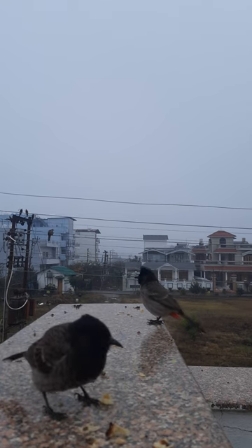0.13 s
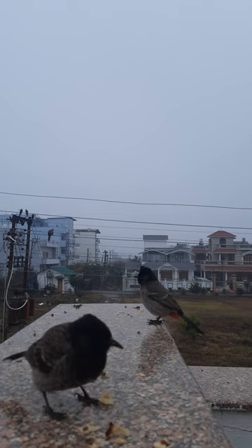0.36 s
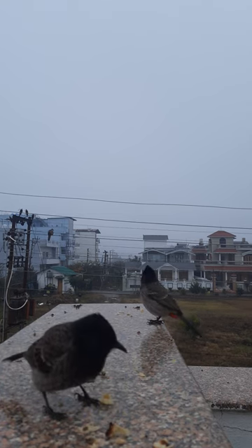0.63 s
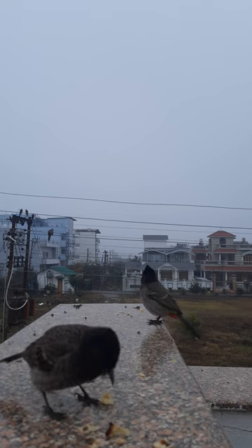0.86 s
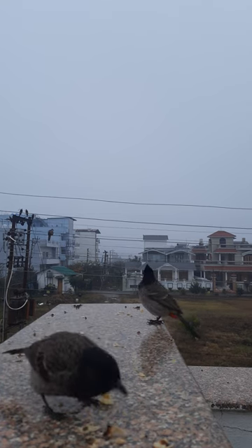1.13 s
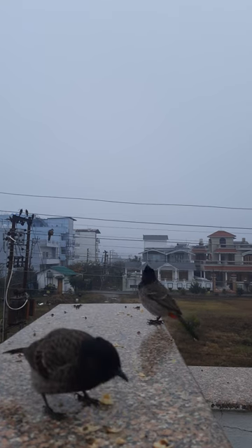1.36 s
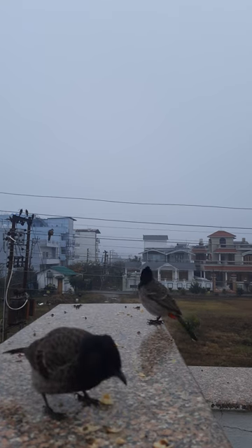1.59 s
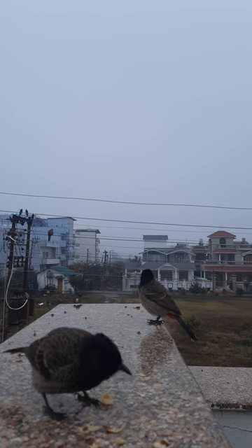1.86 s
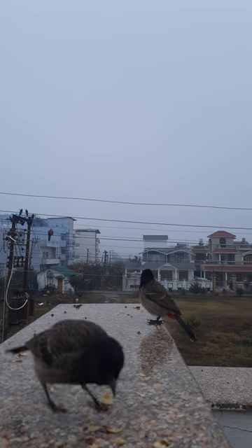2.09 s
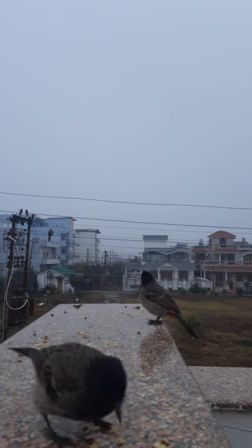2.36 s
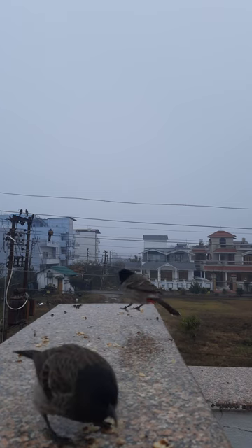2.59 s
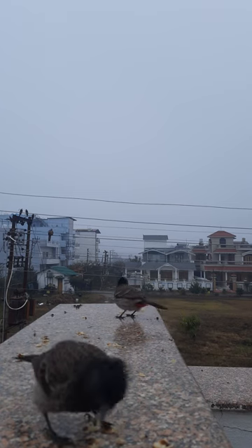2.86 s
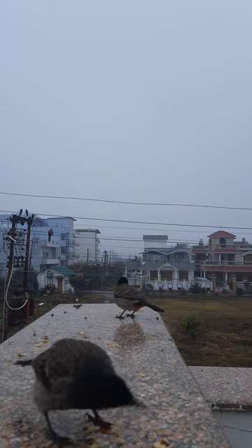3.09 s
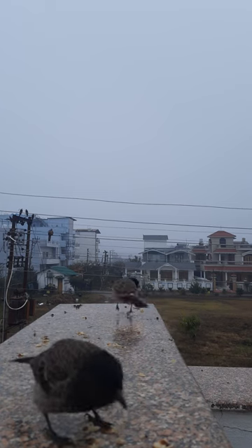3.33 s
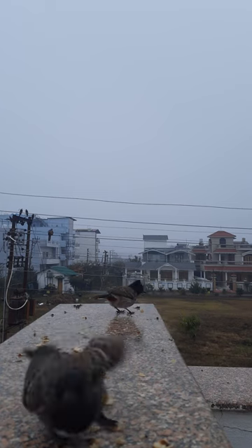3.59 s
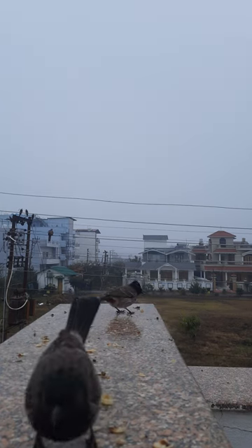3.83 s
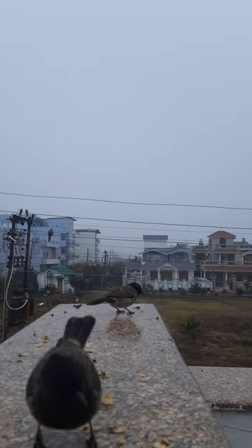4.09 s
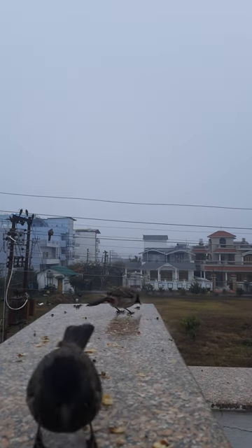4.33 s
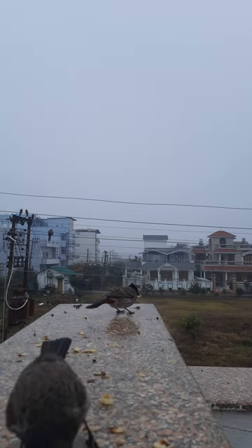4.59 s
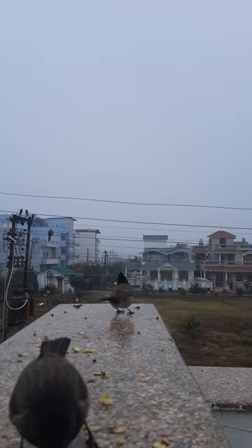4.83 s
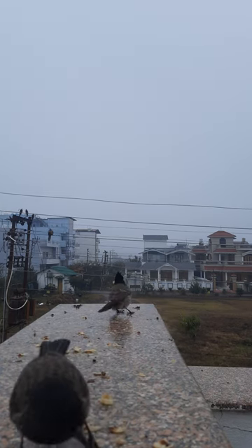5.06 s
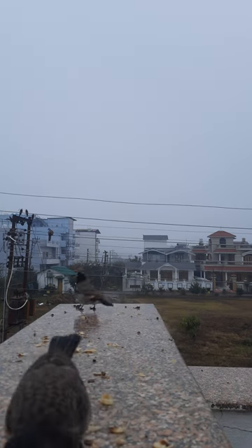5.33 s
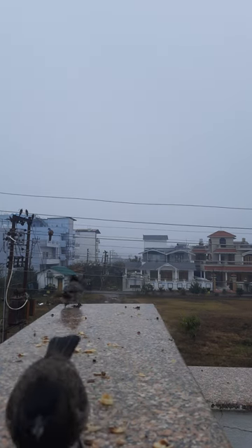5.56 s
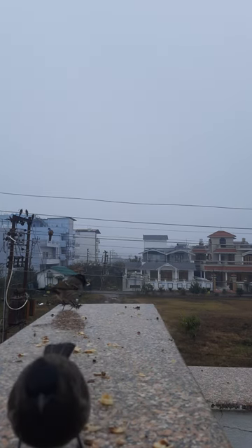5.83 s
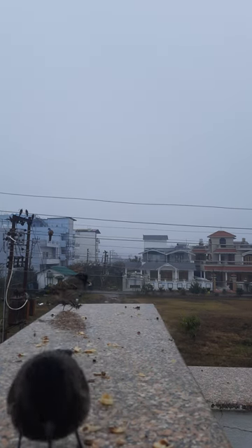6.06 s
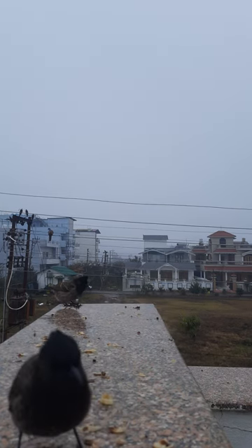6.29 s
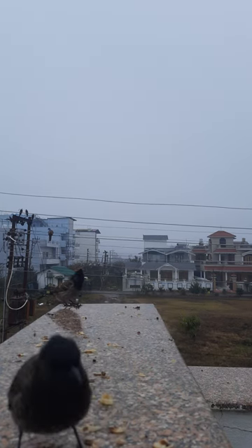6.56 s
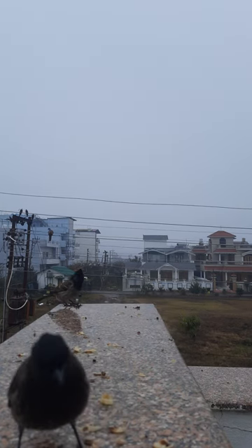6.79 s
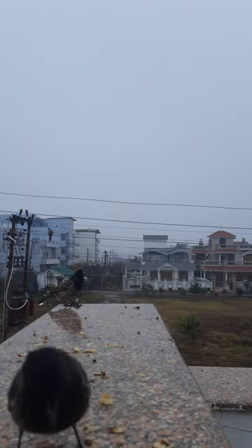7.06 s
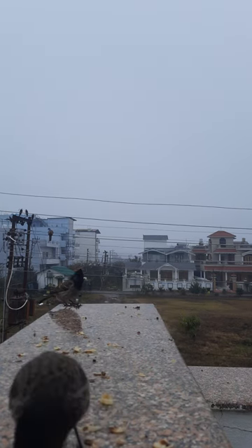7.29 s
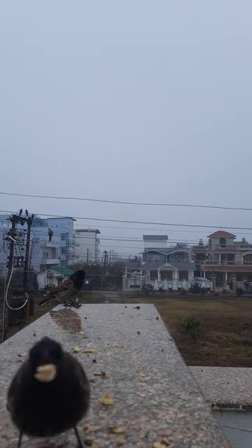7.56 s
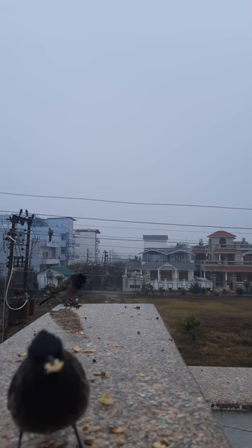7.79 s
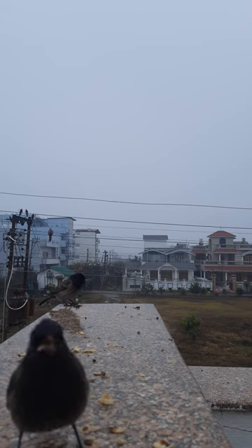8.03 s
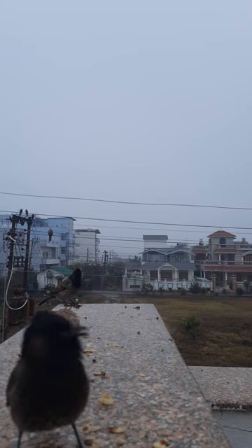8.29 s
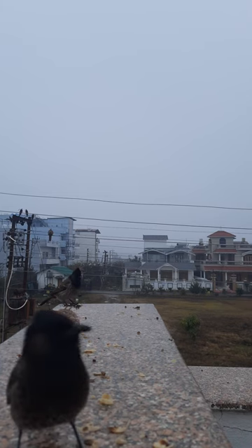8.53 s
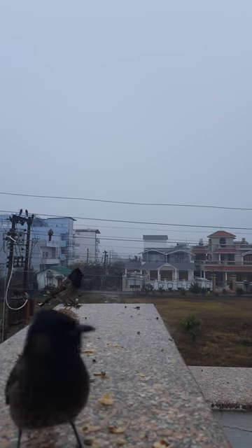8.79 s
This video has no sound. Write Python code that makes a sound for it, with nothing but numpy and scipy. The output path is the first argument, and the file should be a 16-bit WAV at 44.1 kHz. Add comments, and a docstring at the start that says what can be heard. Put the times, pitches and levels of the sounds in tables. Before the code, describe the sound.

A low town rumble runs throughout under a faint, echoing flock of twittering birds, with thin whistles, a distant dove's low coos at about 0, 0.8, 2.3, 2.9 and 7.7 s, and a hoarse rasp roughly every two seconds. A near bird gives short falling chirps at 0.8, 1.3, 2.0, 2.2 and 2.5 s, then from 4.8 to 6.1 s. Pecks and hops knock through the stone from 2.2 s: a heavy thud at 3.2, clusters at 3.7, 4.6 and 4.8, a sharp hard crack at 5.3. Dull clacks rattle further off. At 6.3 s comes a tiny startled squawk, then feathers flurry with a low shudder around 6.4-6.5. A hard thump lands at 7.3, another knock at 7.7, then rustling fades, with soft bumps at 8.0 and 8.7. Left sounds open and airy; right is pressed to stone, muffled and boomy.

```python
"""From the start a town hums, a flock twitters and whistles, a dove coos and a rasp recurs about every two seconds;
from 0.84 s a near bird chirps. From 2.2 s birds peck and hop on a stone ledge, up to a squawk at 6.3 s and a burst
of feathers at 6.4 s; after a last hard thump at 7.3 s the rustle sinks. Left is an open microphone; right is
pressed to the stone, a cavity that booms near 400 Hz. Calls are pitch tracks, contacts bursts, beds coloured noise."""
import sys
import numpy as np
from scipy import signal
from scipy.fft import rfft, irfft, next_fast_len
from scipy.io import wavfile
from scipy.ndimage import uniform_filter1d, minimum_filter1d

SR = 44100
rng = np.random.default_rng(int(sys.argv[2]) if len(sys.argv) > 2 else 0)


def materialize(psi):
    """Save the field psi as 16-bit PCM at rate SR to the path in sys.argv[1].

    A 1-D psi becomes a single channel; in a 2-D psi each row is a channel.
    """
    bounded = np.clip(np.atleast_2d(psi).T, -1, 1)
    quanta = np.round(bounded * 32767).astype(np.int16)
    wavfile.write(sys.argv[1], SR, quanta)


def rack_gain(trim_db):
    """Turn a fader trim in dB into the linear factor to multiply a signal by."""
    fader = np.asarray(trim_db, float)
    return 10 ** (fader / 20)


N = 392931


def level(x, db):
    """Set the rms level."""
    return x * rack_gain(db) / np.sqrt(np.mean(x ** 2))


def curve(table):
    """Join (time [s], value) points by straight lines, one value a sample."""
    s, value = np.transpose(table)
    return np.interp(np.arange(N) / SR, s, value)


def bouts(table, rest_db):
    """Bell-shaped swells of power over a resting level, in dB."""
    t = np.arange(N) / SR
    power = rack_gain(2 * rest_db)
    for s, half_s, db in table:
        power = power + rack_gain(2 * db) * np.exp(-((t - s) / half_s) ** 2)
    return 10 * np.log10(power)


def noise(points, source=None):
    """White noise, or a given source, coloured by (Hz, dB) points and silent outside them."""
    size = next_fast_len(N)
    hz, db = np.transpose(points)
    log_hz = np.log(np.arange(1, size // 2 + 2) * SR / size)
    gain = rack_gain(np.interp(log_hz, np.log(hz), db, left=-200, right=-200))
    white = rng.standard_normal(N) if source is None else source
    return irfft(rfft(white, size) * gain, size)[:N]


def walk(rate_hz):
    """Random levels held 1 / rate s and slewed twice; spread near 1."""
    k = int(SR / rate_hz)
    held = np.repeat(rng.standard_normal(N // k + 1), k)
    return 4 / 3 * uniform_filter1d(uniform_filter1d(held, k), k)[:N]


def grains(rate_hz, spread_db):
    """Dense tiny contacts, most of them faint and a few sharp."""
    hit = rng.random(N) < rate_hz / SR
    return hit * rng.standard_normal(N) * rack_gain(spread_db * rng.exponential(size=N))


def resonance(x, hz, width_hz, low=False):
    """Two-pole band-pass (peak gain 1) or low-pass (bass gain 1); no prewarp, so high tunings land lower."""
    w = 2 * np.pi * hz
    top = [w * w] if low else [2 * np.pi * width_hz, 0]
    return signal.lfilter(*signal.bilinear(top, [1, 2 * np.pi * width_hz, w * w], SR), x)


def mode(x, hz, width_hz, db):
    """One ringing mode: the band-pass applied twice."""
    return rack_gain(db) * resonance(resonance(x, hz, width_hz), hz, width_hz)


def add(track, s, piece):
    """Mix a short piece into a track at s seconds."""
    i = max(int(s * SR), 0)
    track[i:i + len(piece)] += piece[:N - i]


def echoes(x, t60_s):
    """Diffuse echo off the house fronts, its tail at unit energy."""
    t = np.arange(int(.5 * SR)) / SR
    tail = rng.standard_normal(len(t)) * np.exp(-np.log(1000) * t / t60_s) * np.clip(t / 0.0032, 0, 1)
    return signal.fftconvolve(x, tail / np.sqrt(np.sum(tail ** 2)))[:N]


def glide(length, first_hz, last_hz, arch_hz):
    """Pitch of a straight glide with an arch in the middle, lasting 1.15 times the length given."""
    u = np.linspace(-1, 1, int(length * 1.15 * SR))
    return (first_hz + last_hz) / 2 + (last_hz - first_hz) / 2 * u + arch_hz * (1 - u * u)


def call(hz, db, octave_db=-60, fade_db=3):
    """One note along a pitch track; its octave is loudest where it meets the throat resonance."""
    throat_hz = 2460
    u = np.linspace(-1, 1, len(hz))
    phase = 2 * np.pi * np.cumsum(hz) / SR
    octave = rack_gain(-5 - 0.03 * np.abs(2 * hz - throat_hz)) + rack_gain(octave_db + 6 * u)
    envelope = (1 - u * u) ** 0.8 * rack_gain(-fade_db * u)
    return rack_gain(db + 7.0) * envelope * (np.sin(phase) + octave * np.sin(2 * phase))


# pecks and hops felt through the stone: (time [s], relative level [dB], push width [ms])
KNOCK_BLOWS = [(.532, -24.5, 0.92), (1.103, -33, 0.45), (2.1784, -7.5, 0.56), (2.1911, -19, 0.49),
               (2.3807, -23, 2), (2.58, -16, 0.98), (2.695, -29.5, 0.18), (2.7029, -21.5, 0.81),
               (3.166, -32.5, 0.345), (3.226, -22.5, 0.72), (3.2356, 5.5, 2.36), (3.2586, -6.5, 4.8),
               (3.35, -16, 3.9), (3.3689, -9, 3.75), (3.43, -31.5, 0.44), (3.441, -26, 0.47),
               (3.7296, -11.5, .78), (3.7388, -21, 0.73), (3.7561, -16.5, 1.9), (3.7661, -18, 0.54),
               (4.4931, -17, 0.58), (4.6153, -8, .91), (4.6264, -2.5, 1.25), (4.6355, -4.5, 0.76),
               (4.6443, -17.5, 1), (4.6557, -16, 0.8), (4.823, -4, 0.78), (4.834, -8, 0.68),
               (4.8817, -18.5, 0.73), (4.8888, -15, 0.81), (5.2697, -22.5, 1.1), (5.3026, -12.5, 1.4),
               (5.3107, -19, .38), (5.3237, -27.5, .06), (5.331, -25, 0.92), (5.343, 5, 0.79),
               (5.367, -1, 0.86), (5.5275, -30.5, 0.17), (5.534, -35, .12), (5.549, -28, 0.02),
               (5.822, -14, 1.7), (5.84, -21.5, 0.83), (5.8485, -24, 1.4), (5.956, -24, 1.2),
               (6.188, -31.5, 0.17), (6.223, -23.5, 0.48), (6.3204, -22, 2.8), (6.346, -13.5, 3.65),
               (6.397, -29, 2.2), (6.4303, -19.5, 2.3), (6.4546, -10.5, 3.7), (6.4711, -4, 3.75),
               (6.4779, 2, 3.8), (6.5012, -1, 6.5), (6.6065, -27, 1.3), (6.828, -9, 1.46),
               (6.8444, -20, 1.06), (6.8676, -20.5, 3), (7.279, 5, 1.04), (7.381, -27.5, 0.98),
               (7.652, -17.5, 1.23), (7.6582, -2.5, 3.2), (7.6785, -16.5, 1.9), (7.6925, -20, 2.3),
               (7.701, -38, .16), (7.715, -23.5, 2.3), (7.9979, -13, 3.7), (8.668, -21.5, 3.8),
               (8.7096, -16, 4.2), (8.7192, -16.5, 3.45)]
# what a hard crack rings in the stone: (tuning [Hz], width [Hz], relative level [dB])
STONE_MODES = [(720, 370, -3.5), (1131, 152, 8), (2110, 460, -10.5)]


def knocks():
    """A longer push is a lower shudder of the stone with a duller crack; a faint bounce and a tremble follow."""
    crack_db, crack_dulls_db_per_ms_khz = 17, 45.5
    aftershake_db, aftershake_s = -43, 0.048
    t = np.arange(-400, 400) / SR
    shake, snap, blows = np.zeros(N), np.zeros((len(STONE_MODES), N)), np.zeros(N)
    for s, db, ms in KNOCK_BLOWS:
        late, turn = rng.random(2)
        bell = np.exp(-.5 * (1000 * t / max(ms, .03)) ** 2)
        shudder = rack_gain(db) * bell / bell.sum() * np.cos(2 * np.pi * (440 - 24 * ms) * t)
        add(shake, s + t[0], shudder)
        bounce = rack_gain(-28.0) * np.cos(2 * np.pi * turn) * shudder
        add(shake, s + t[0] + 0.011 + 0.0049 * late, bounce)
        grit = rng.standard_normal(len(t)) * (t > 0) * np.exp(-np.abs(t) / 0.001)
        blow = 7 * (t == 0) + 0.46 * grit
        for track, (hz, _, _) in zip(snap, STONE_MODES):
            dulling_db = crack_dulls_db_per_ms_khz * ms * hz / 1000
            add(track, s + t[0], rack_gain(db + crack_db - dulling_db) * blow)
        add(blows, s, rack_gain(db + aftershake_db) * np.ones(1))
    crack = sum(mode(x, *row) for x, row in zip(snap, STONE_MODES))
    after = signal.lfilter([1], [1, -np.exp(-1 / (aftershake_s * SR))], blows)
    high_pass = signal.butter(2, 220, "high", fs=SR, output="sos")
    return rack_gain(30) * signal.sosfilt(high_pass, shake), crack, after


def tremble(rustle_db, after):
    """Low grains in the stone follow the birds' stirring and the fading aftershake."""
    rumbling = level(noise([(180, -20), (260, 4), (500, -4), (900, -35)], grains(1500, 2.2)), -11)
    stir = rack_gain(-52.5 + 0.35 * (rustle_db + 80) + 5.17 * walk(25))
    return rumbling * (stir + after)


# side modes of the closed port: (tuning [Hz], width [Hz], relative level [dB])
PORT_MODES = [(243.3, 96, 1.5), (735, 383, 3.5), (1150, 180, -13.5), (1790, 500, -27)]


def port(x):
    """The closed cavity in front of the right microphone: a boom, a seal against the treble, side modes."""
    boom = resonance(x, 396.7, 70.4, low=True)
    sealed = resonance(boom, 614, 598, low=True)
    sides = [mode(x, *row) for row in PORT_MODES]
    # the two upper modes swing against the lower ones, which leaves a gap near 1 kHz
    return sealed + sides[0] + sides[1] - sides[2] - sides[3]


# startled squawk at the phone: (time [s], pitch [Hz])
SQUAWK_PITCH = [(6.281, 1022), (6.297, 1760), (6.302, 1560), (6.306, 1250), (6.315, 1150), (6.326, 1210)]


def squawk():
    """Pitch leaps up, falls and levels off, with a jittery level and no echo."""
    s, hz = np.transpose(SQUAWK_PITCH)
    note = call(np.interp(np.arange(s[0], s[-1], 1 / SR), s, hz), -38.5)
    track = np.zeros(N)
    add(track, s[0], note * rack_gain(4.5 * np.linspace(-1, 1, len(note))))
    return track * rack_gain(3.3 * walk(300))


# claw ticks and feather strokes close by: (time [s], relative level [dB], decay constant [ms])
TICK_STROKES = [(1.103, -53, 2.2), (2.9961, -66, 8), (3.5409, -27.5, 0.4), (3.6229, -56.5, 16),
                (3.6601, -54, 1.8), (3.913, -63.5, 7.7), (4.6353, -60, 1.5), (4.7957, -60.5, 3.6),
                (5.2004, -59.5, 12), (5.6785, -65.5, 26), (6.1718, -60, 2.1), (6.2402, -61, 2),
                (6.2734, -49.5, 10), (6.3048, -50.5, 3.3), (6.337, -50, 14), (6.363, -46, 5.6),
                (6.3798, -40.5, 6.2), (6.402, -51.5, 20), (6.424, -38, 1.4), (6.545, -56.5, 17),
                (6.6029, -49.5, 7.4), (6.6602, -53, 13), (6.7286, -58.5, 9), (7.0728, -64.5, 4)]


def ticks():
    """Snap plus noise burst: short ones broad, long ones thin; dulled around 7 kHz and at the top."""
    track, t = np.zeros(N), np.arange(2600) / SR
    for s, db, fade_ms in TICK_STROKES:
        burst = rng.standard_normal(len(t))
        thin = burst - min(fade_ms / 4, .95) * uniform_filter1d(burst, size=5)
        snap = .5 / fade_ms * np.sin(2 * np.pi * 3300 * t) * np.exp(-t / .0003)
        envelope = np.exp(-t / (fade_ms / 1000)) * np.minimum(t / (fade_ms / 8000), 1)
        add(track, s, rack_gain(db + 3) * (thin + snap) * envelope)
    dip = resonance(track, 7500, 2500)
    return resonance(track - 0.78 * dip, 16000, 20000, low=True)


# movement of the birds on the ledge: (time [s], relative level [dB])
BRUSH_LEVEL = [(0, -79), (.35, -73.5), (.8, -81), (1.07, -77), (1.8, -86), (2.6, -77.5), (3.15, -75.5),
               (3.3, -82), (3.7, -76), (4.3, -82), (5.1, -73.5), (5.4, -65), (5.8, -82), (6.15, -72),
               (6.42, -59.5), (6.5, -74), (6.6, -65), (6.9, -79), (7.25, -78.5), (8.2, -99), (8.91, -79)]


def brushing_db():
    """How much the birds on the ledge move."""
    return curve(BRUSH_LEVEL)


# feather colour: (frequency [Hz], relative level [dB])
RUSTLE_COLOUR = [(300, 3.5), (2000, 9), (5000, -7), (7800, -13), (9500, -4), (11500, -2), (14000, -5),
                 (16000, -13)]


def feathers(rustle_db):
    """Feathers brush in quick strokes made of fine grains."""
    return level(noise(RUSTLE_COLOUR, grains(9000, 1.9)), 8.2) * rack_gain(rustle_db + 2.0 * walk(22))


# scuffle colour: (frequency [Hz], relative level [dB])
SCUFFLE_COLOUR = [(150, -11.5), (400, -3.5), (750, 0), (1000, 2.5), (1350, -1), (1750, -1.5), (2200, -12.5),
                  (4000, -37)]


def scuffle(rustle_db, twitter_db):
    """Mid-band noise of feet, rising with the rustle and with bouts in the flock."""
    feet_db = -67 + 0.32 * (rustle_db + 80)
    squabble_db = twitter_db - 1
    scuffle_db = 10 * np.log10(rack_gain(2 * feet_db) + rack_gain(2 * squabble_db))
    return level(noise(SCUFFLE_COLOUR), 7.38) * rack_gain(scuffle_db + 1.1 * walk(30))


# falling chirp of one near bird:
# (nominal start [s], nominal length [s], top of fall [Hz], relative level [dB], octave as the head turns [dB])
CHIRP_NOTES = [(0.84, 0.049, 2004, -47.5, -53), (1.329, 0.039, 1946, -49.5, -45),
               (1.974, 0.043, 1984, -49.5, -17), (2.247, 0.048, 1983, -48, -23),
               (2.471, 0.034, 1920, -46, -22), (4.773, .04, 1990, -49.5, -32),
               (5.209, 0.041, 2040, -47, -19), (5.439, 0.053, 1996, -45.5, -35),
               (5.834, 0.04, 1980, -51, -14.5), (6.089, .03, 1990, -53, -13)]


def chirps():
    """A chirp scoops up from below, then falls steadily."""
    scoop_s, scoop_hz, fall_hz_per_nominal_s = .0035, 600, 8500
    notes = []
    for s, length, top_hz, db, octave_db in CHIRP_NOTES:
        hz = glide(length, top_hz, top_hz - fall_hz_per_nominal_s * length, 0)
        hz = hz - scoop_hz * np.exp(-np.arange(len(hz)) / (scoop_s * SR))
        notes.append((s, db, call(hz, db, octave_db, fade_db=1.5)))
    return notes


# whistles of other birds:
# (nominal start [s], nominal length [s], first pitch [Hz], last pitch [Hz], relative level [dB])
WHISTLE_NOTES = [(0.092, 0.053, 2240, 2100, -66), (0.045, 0.037, 3600, 3270, -68),
                 (0.421, 0.1, 3350, 3100, -66.5), (2.1, .05, 3600, 2750, -66),
                 (2.304, .03, 3600, 3220, -67), (2.61, 0.044, 3730, 3500, -71.5),
                 (1.118, .022, 2540, 1660, -68), (1.182, 0.055, 2720, 2600, -68.5),
                 (1.186, 0.027, 3980, 3350, -66.5), (1.28, 0.084, 4040, 4200, -75),
                 (1.605, 0.085, 4780, 4800, -81), (1.644, .22, 2470, 2780, -76),
                 (1.722, .08, 4150, 3820, -80.5), (2.8, 0.048, 2930, 2740, -67),
                 (2.819, 0.082, 3320, 3040, -68.5), (2.91, .056, 2520, 2390, -66.5),
                 (3.49, 0.057, 2110, 2770, -67), (4.63, 0.046, 3810, 3420, -64),
                 (4.819, 0.036, 2950, 2700, -61), (4.961, 0.065, 3680, 3080, -66),
                 (7.244, 0.037, 4240, 4080, -67), (7.32, 0.054, 3700, 1930, -65.5),
                 (7.859, .03, 3540, 3770, -73), (7.612, 0.066, 3600, 2450, -73.5),
                 (7.74, .025, 1580, 1530, -60), (8.213, .03, 2900, 4570, -74.5),
                 (8.368, .055, 3250, 5050, -84), (8.56, .08, 3840, 3860, -68)]


def whistles():
    """Glides whose middle sits 1.5 % above the straight line."""
    return [(s, db, call(glide(length, first, last, .015 * (first + last) / 2), db))
            for s, length, first, last, db in WHISTLE_NOTES]


# far dove: (nominal start [s], nominal length [s], relative level [dB])
COO_NOTES = [(0, .16, -55.5), (0.838, .11, -52.5), (2.341, .1, -53), (2.911, .16, -60),
             (7.662, .092, -57.5)]


def coos():
    """Low notes at 425 Hz, arched by 5.5 Hz."""
    return [(s, db, call(glide(length, 425, 425, 5.5), db)) for s, length, db in COO_NOTES]


def birds():
    """Loud calls are near and mostly direct; faint ones come from afar, flickering faster and with more echo."""
    near, far = np.zeros(N), np.zeros(N)
    for s, db, note in chirps() + whistles() + coos():
        nearness = np.clip((db + 71.5) / 20, 0, 1)
        start_s = s - .065 * len(note) / SR
        add(near, start_s, nearness * note)
        add(far, start_s, (1 - nearness) * note)
    near, far = near * rack_gain(3.3 * walk(200)), far * rack_gain(3.2 * walk(350))
    return near + rack_gain(-10) * echoes(near, .45) + far + rack_gain(-8) * echoes(far, .3)


# larger bird further off: (start [s], nominal length [s], relative level [dB])
RASP_NOTES = [(0.204, 0.083, -61.5), (2.051, 0.085, -64), (4.207, 0.071, -64.5), (5.941, 0.064, -61.5),
              (7.562, 0.093, -71)]
# its overtones: (multiple of the pitch, relative level [dB])
RASP_PARTIALS = [(1, -13), (2, 4), (3, -3.5), (4, -18.5), (5, -22.5), (6, -22)]


def rasps():
    """A shaky arched pitch with strong overtones, half lost in echo."""
    track, shaky = np.zeros(N), walk(500)
    for s, length, db in RASP_NOTES:
        hz = glide(length, 1170, 960, 170)
        jitter = .015 * shaky[int(s * SR):][:len(hz)]
        phase = 2 * np.pi * np.cumsum(hz * (1 + jitter)) / SR
        tone = sum(rack_gain(d) * np.sin(k * phase) for k, d in RASP_PARTIALS)
        add(track, s, rack_gain(db + 2) * np.hanning(len(hz)) ** 0.32 * tone)
    track = track * rack_gain(2.1 * walk(300))
    return track + rack_gain(-3) * echoes(track, 0.84)


# dull clacks further off: (time [s], relative level [dB])
CLACK_HITS = [(0.2134, -51), (3.1656, -46.5), (3.406, -51), (3.8182, -48), (3.8706, -42.5), (3.937, -49),
              (4.2795, -45), (4.622, -45.5), (4.679, -42), (4.7461, -41.5), (5.0266, -45), (5.0844, -43),
              (5.145, -47.5), (5.4314, -42.5), (5.4812, -39.5), (5.541, -39), (5.876, -42.5),
              (6.6776, -43.5), (7.012, -47), (7.413, -51), (7.4774, -49), (7.75, -54.5), (7.817, -54),
              (8.1538, -53), (8.5457, -52)]
# what they ring: (tuning [Hz], width [Hz], relative level [dB])
CLACK_RINGING = [(519, 140, -8.5), (979, 230, 5.5), (1410, 300, 0.5), (1790, 350, -5), (2670, 690, -12)]


def clacks():
    """Each clack is a short rattle that rings broad modes, then echoes."""
    rattle, t = np.zeros(N), np.arange(int(0.055 * SR)) / SR
    for s, db in CLACK_HITS:
        add(rattle, s, rack_gain(db + 18.0) * rng.standard_normal(len(t)) * np.exp(-t / 0.006))
    track = sum(mode(rattle, *row) for row in CLACK_RINGING)
    return track + rack_gain(-3) * echoes(track, .3)


# bouts in the flock further off: (middle [s], half length [s], relative level [dB])
CHATTER_BOUTS = [(.2, 0.16, -72), (1.0, 0.022, -67.5), (1.2, 0.11, -74.5), (2.12, 0.16, -68),
                 (3.1, 0.11, -70.5), (4.25, 0.032, -65), (4.72, 0.21, -66.5), (6.0, 0.059, -67),
                 (6.4, 0.21, -65.5), (7.1, 0.092, -70), (7.26, 0.054, -67), (8.86, 0.15, -77)]


def chatter_db():
    """Bouts of chatter over a resting level that sinks 0.23 dB each second."""
    return bouts(CHATTER_BOUTS, -76 - 0.23 * np.arange(N) / SR)


# twitter colour: (frequency [Hz], relative level [dB])
TWITTER_COLOUR = [(1500, -13.5), (2400, 3), (3600, -4), (4600, -6.5), (6000, -18.5), (8000, -29)]


def twitter(twitter_db):
    """The blurred flock as flickering coloured noise."""
    return level(noise(TWITTER_COLOUR), 2.5) * rack_gain(twitter_db + 1.6 * walk(34))


def chorus():
    """Many small birds all over the town, hoarse, overlapping and half lost in echo."""
    song = np.zeros(N)
    for when, length, pitch, bend, size in rng.random((520, 5)):
        hz = 2200 + 1900 * pitch
        first_hz, last_hz = hz * (1.2 - 0.22 * bend), hz * (.78 + 0.22 * bend)
        track_hz = glide(.012 + 0.043 * length, first_hz, last_hz, .03 * hz)
        add(song, when * N / SR, call(track_hz, -13 * size - 8 * pitch))
    song = song * rack_gain(5 * walk(400))
    return .7 * song + echoes(song, .3)


# traffic: (time [s], relative level [dB])
TRAFFIC_LEVEL = [(0, -55), (1.5, -57), (4.5, -55.5), (7.1, -55), (7.4, -60), (8.91, -59.5)]
# air from wings and wind: (middle [s], half length [s], relative level [dB])
AIR_PUFFS = [(1.01, 0.11, -48.5), (5.5, 0.04, -49.5), (5.86, 0.042, -48.5), (6.33, 0.1, -46.5),
             (6.65, 0.082, -53)]
# rumble colour: (frequency [Hz], relative level [dB])
RUMBLE_COLOUR = [(25, -24.5), (36, -12), (44, 2.5), (80, 1.5), (130, -4.5), (250, -6.5), (500, -8.5),
                 (900, -55.5)]


def hum():
    """Low traffic noise, swelled by puffs of air."""
    rumble_db = bouts(AIR_PUFFS, curve(TRAFFIC_LEVEL))
    return level(noise(RUMBLE_COLOUR), 0.38) * rack_gain(rumble_db + 2.67 * walk(8))


def scene():
    """Open port left, closed port right; the rumble and the calls reach both, the rest differs."""
    rustle_db, twitter_db = brushing_db(), chatter_db()
    shake, crack, after = knocks()
    stone = shake + tremble(rustle_db, after)
    left_air, right_air = (feathers(rustle_db) + scuffle(rustle_db, twitter_db) + twitter(twitter_db)
                           for _ in range(2))
    calls = squawk() + birds() + rasps()
    small = ticks() + clacks() + level(chorus(), 3.7) * rack_gain(twitter_db)
    shared_hum, right_hum = hum(), hum()
    # shared sound reaches the right port 4 samples later
    late = np.roll(shared_hum + calls + rack_gain(-12.5) * small, 4)
    right = port(late + rack_gain(-9.5) * right_hum + rack_gain(-11) * right_air + stone) + crack
    return np.array([shared_hum + left_air + calls + small, right])


def roll_off(x):
    """The treble ends steeply here."""
    return signal.sosfilt(signal.butter(12, 16460, fs=SR, output="sos"), x)


# self-noise ahead of the limiter: (frequency [Hz], density [dB per Hz])
HISS_DENSITY = [(200, -120), (5000, -126), (8000, -127), (11000, -122), (16000, -123)]


def record(dry):
    """Self-noise, then a limiter that ducks both channels at the hardest knocks and lets go slowly."""
    hiss = np.array([noise(HISS_DENSITY), noise(HISS_DENSITY)]) * np.sqrt(SR / 2)
    peak = -minimum_filter1d(-np.abs(dry).max(axis=0), size=256)
    cut_db = np.maximum(20 * np.log10(peak / rack_gain(-2.5) + 1e-9), 0) * .9
    # the cut falls back at 14 dB/s
    fall_db = 14 * np.arange(N) / SR
    held_db = np.maximum.accumulate(cut_db + fall_db) - fall_db
    gain = rack_gain(-uniform_filter1d(held_db, size=128))
    mix = (dry * rack_gain(1.5) + hiss) * gain
    return roll_off(mix)


dry = scene()
out = record(dry)
materialize(out)
```